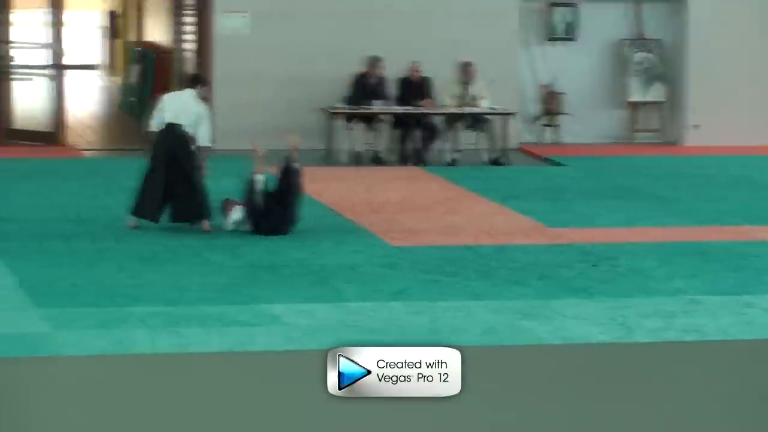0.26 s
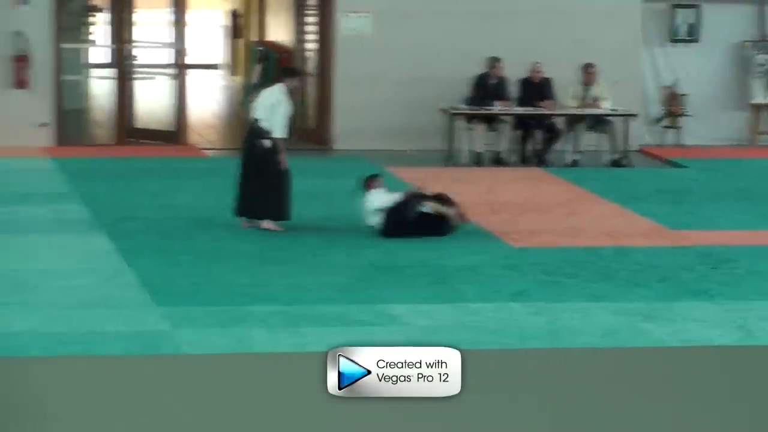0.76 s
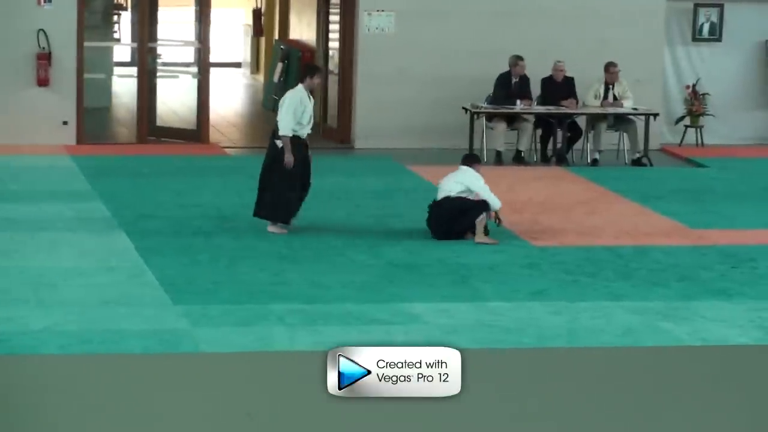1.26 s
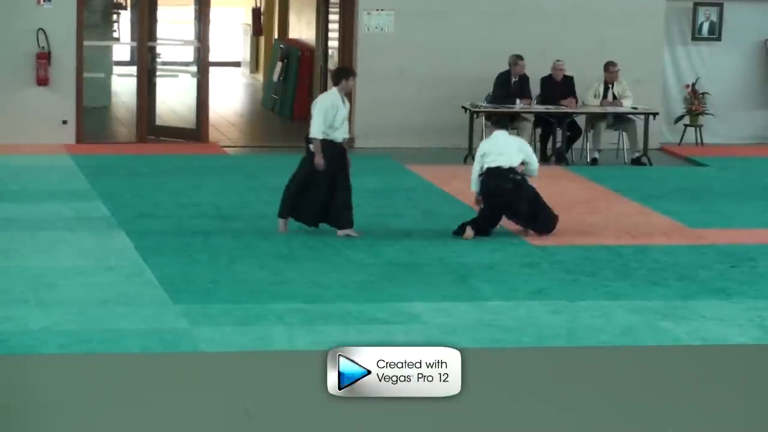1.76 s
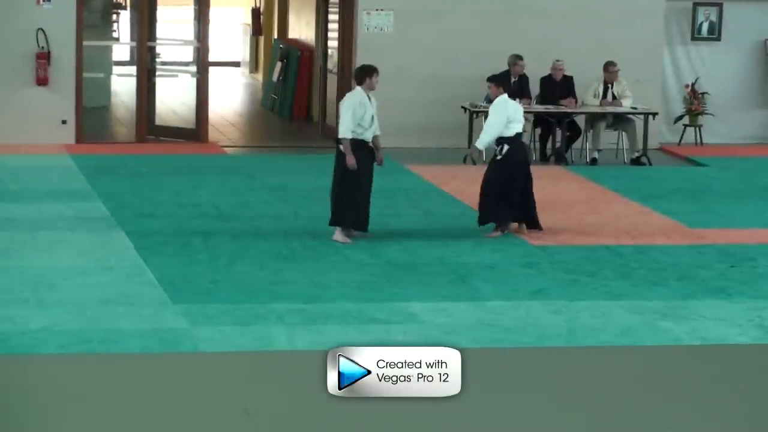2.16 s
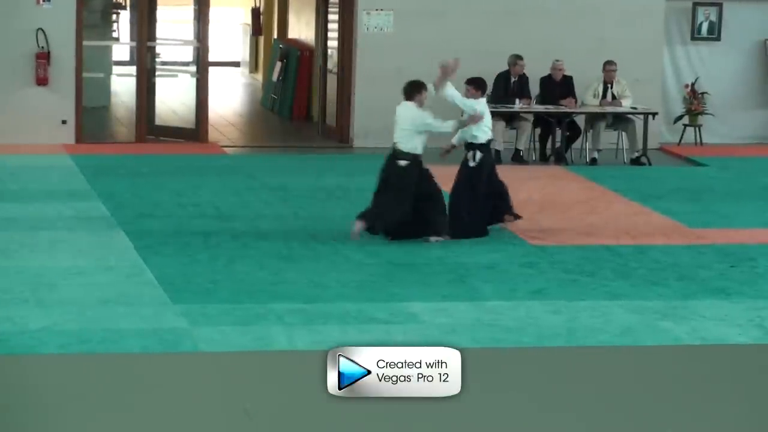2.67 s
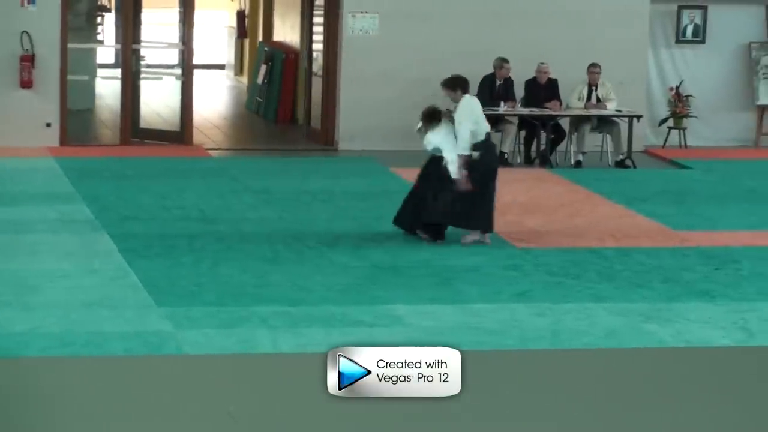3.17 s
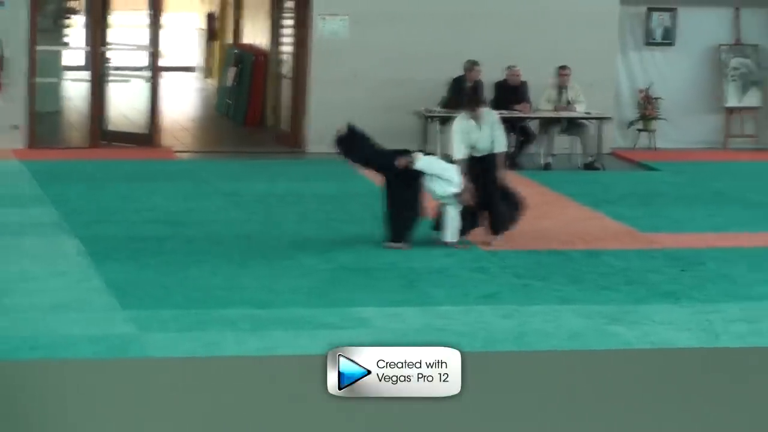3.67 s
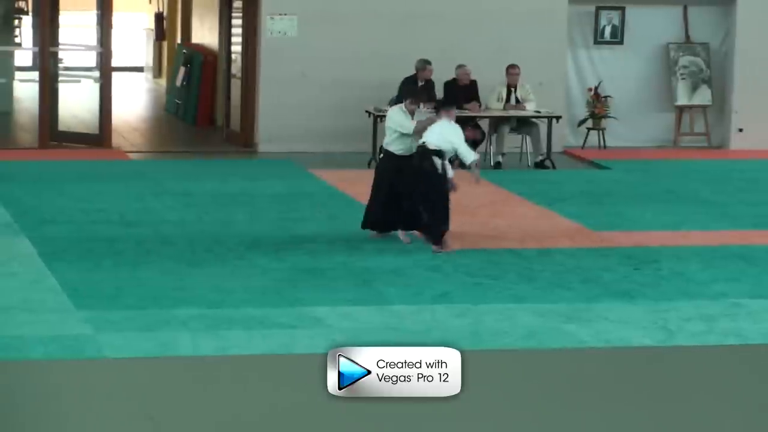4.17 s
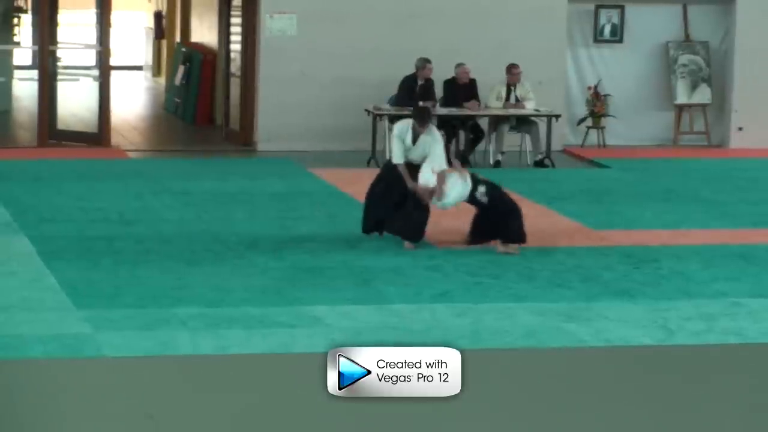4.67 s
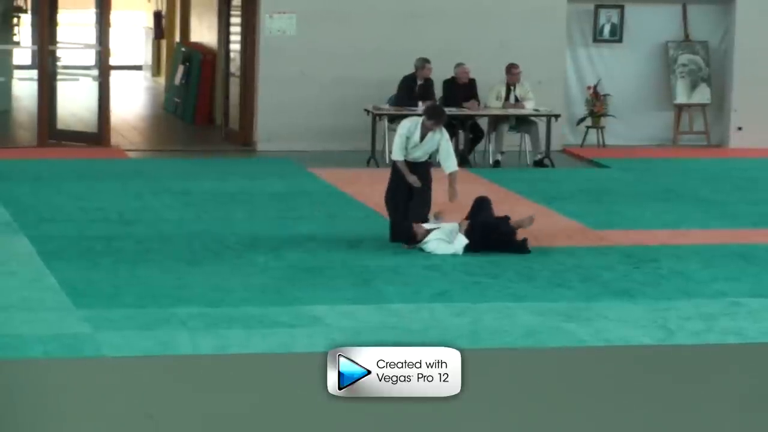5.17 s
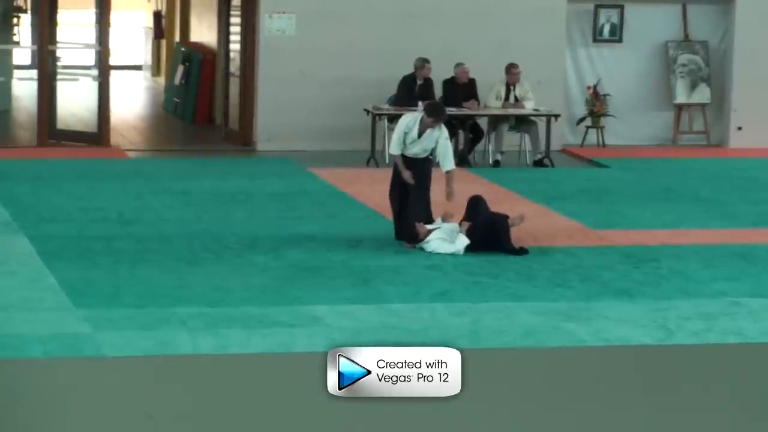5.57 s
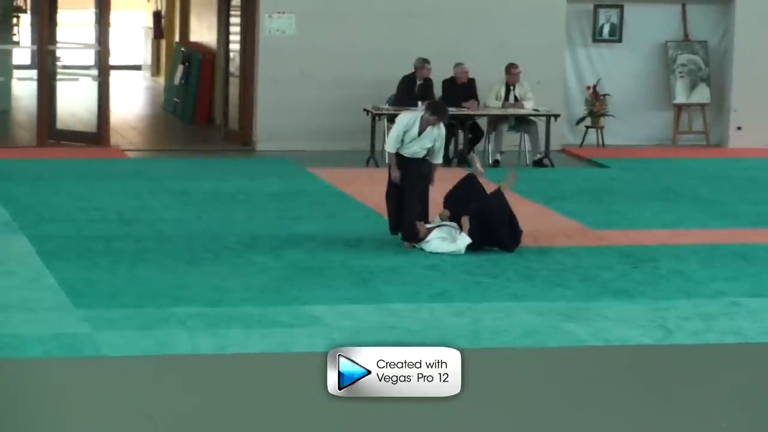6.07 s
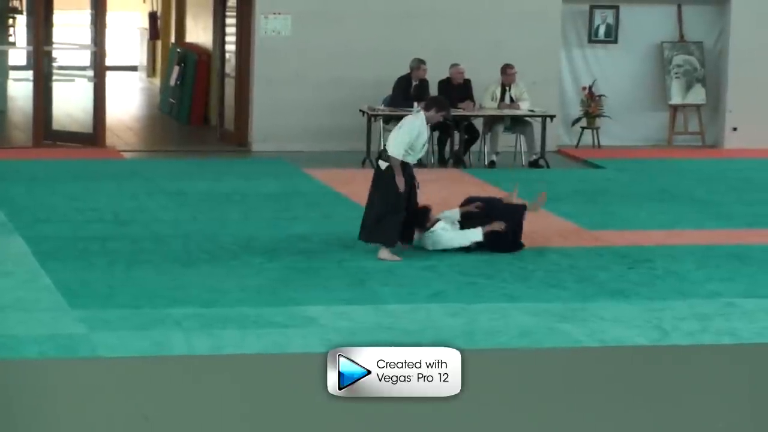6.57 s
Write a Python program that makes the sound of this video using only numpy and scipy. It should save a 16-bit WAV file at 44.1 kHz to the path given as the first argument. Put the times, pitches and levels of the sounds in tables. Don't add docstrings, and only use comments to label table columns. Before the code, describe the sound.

A large, reverberant hall heard from a distant stereo camera, with low ventilation rumble and soft hiss throughout. At the start the low boom and ring of an earlier fall die away, with dull knee bumps at 0.06, 0.3 and 0.6 seconds, a low chirp of skin near 0.65, and faint cloth and foam shuffling until 2. At 2.02 a foot stamps with a short, bright crack, a softer second hit right behind it; the floor booms and walls slap back. A slide and higher squeak come around 2.6, soft shuffling near 3.1, a bright slide with a thin falling squeal at 3.4, and light quick steps from 4.05 to 4.5. At 4.94 a body and palms slam down: the loudest, a broad slap with deep thud, fluttering echoes and a ringing tail of over a second. Foam shifts near 5.65; an airy slide brushes by at 6.5, then hum.

```python
import sys
import numpy as np
from scipy import signal
from scipy.fft import rfft, irfft
from scipy.io import wavfile
from scipy.ndimage import uniform_filter1d, map_coordinates

SR = 44100
rng = np.random.default_rng(int(sys.argv[2]) if len(sys.argv) > 2 else 0)


def output_pcm(signal):
    pcm = np.clip(np.atleast_2d(signal).T, -1, 1) * 32767
    wavfile.write(sys.argv[1], SR, np.round(pcm).astype(np.int16))


def voltage_ratio(level):
    return 10 ** (np.asarray(level, float) / 20)


N = 301203
LEAD = SR // 2

# start in seconds, slap peak in dB, thud peak in dB,
# hall level relative to the slap in dB, hall level relative to the thud in dB.
EARLIER = [
    (-.2, -29.5, -21.5, -10.5, -5),
]
STAMP = [
    (2.0213, -11.5, -15, -20.5, -8),
    (2.0586, -18, -13.5, -21, -7),
]
FALL = [
    (4.9418, -13.5, -7, -14.5, -10.5),
]
# pitch in Hz, level in dB, time to fade 60 dB in seconds.
STAMP_MAT = [(194, -3, 0.058), (347, 5.5, 0.026), (415, 3, 0.036), (515, 2, 0.017)]
FALL_MAT = [(166.6, -7, 0.16), (300.5, -0.5, 0.06), (367.6, -2.5, 0.069), (538, -6, 0.023)]
# frequency in Hz, level in dB per Hz.
SNAP = [(500, -8), (1000, 9.5), (1700, 1), (2100, 6.5), (2700, 1.5), (3700, -0.5), (5000, -3), (6800, -3.5),
        (11000, -19), (15500, -52)]
SLAP = [(500, -16), (1100, 11.5), (1500, -2), (2000, 6), (2600, -1), (3300, 2.5), (5000, -6), (7000, -10),
        (11000, -19.5), (15500, -39)]


def unit(x):
    return x / np.sqrt(np.mean(np.abs(x) ** 2) + 1e-20)


def along(points, hz):
    f, v = np.transpose(points)
    return np.interp(np.log(hz + 1), np.log(f + 1), v)


def wobble(rate):
    return map_coordinates(rng.standard_normal(int(N * rate / SR) + 4), [np.arange(N) * rate / SR])


def patchy(hz, t, across, along_time):
    field = rng.standard_normal((len(hz), len(t)))
    return unit(uniform_filter1d(uniform_filter1d(field, size=across, axis=0), size=along_time, axis=1))


def stereo(length, shape, alike, pan, lead=((100, 0),)):
    hz, t, z = signal.stft(rng.standard_normal((2, length)), SR, nperseg=1024)
    turn = np.arccos(np.clip(along(alike, hz), -1, 1))[:, None] / 2
    mid, side = z[0] * np.cos(turn), z[1] * np.sin(turn)
    lean = (voltage_ratio(along(pan, hz) / 2) * np.exp(.5j * along(lead, hz)))[:, None]
    pair = np.array([(mid + side) * lean, (mid - side) / lean])
    pair = pair / np.hypot(np.abs(lean), 1 / np.abs(lean)) * np.sqrt(2)
    return signal.istft(pair * shape(hz[:, None], t), SR, nperseg=1024)[1][:, :length]


def add(track, s, sound):
    at = LEAD + round(s * SR)
    track[:, at:at + sound.shape[1]] += sound


def strokes(rows):
    s, db, rise, fall = np.transpose(rows)[:4, :, None]
    late = np.arange(0, N + 64, 64) / SR - s
    distance = np.where(late < 0, -late / rise, late / fall)
    return voltage_ratio(db - 10.5 * distance ** 1.38)


def smooth(steps):
    return np.interp(np.arange(N) / 64, np.arange(len(steps)), steps)


def air():
    # frequency in Hz, level in dB per Hz.
    hum = [(15, -4), (26, 0), (36, 6), (65, -6), (125, -5.5), (200, -13), (400, -17), (1000, -18.5),
           (2200, -24), (3200, -28), (6000, -31.5), (9000, -35.5), (12000, -41), (15600, -41)]
    # frequency in Hz, likeness from 0 to 1.
    likeness = [(60, 0.87), (150, 0.33), (380, 0.45), (950, 0.37), (2380, 0.42), (5980, 0.35),
                (15000, 0.14)]
    # frequency in Hz, left over right in dB.
    balance = [(60, -17), (120, -17.5), (240, -7.5), (480, -0.5), (950, 1), (3800, 0), (8000, -3.5),
               (11400, -0.5), (11600, -60), (14700, -60), (14900, -26)]

    def shape(hz, t):
        return voltage_ratio(along(hum, hz) + patchy(hz, t, 14, 8))
    return voltage_ratio(-46 + 0.24 * wobble(2.83)) * unit(stereo(N, shape, likeness, balance))


def shifting_weight():
    # peak time in seconds, level in dB, rise in seconds, fall in seconds.
    shuffle = [(.1, -54, 0.14, 0.09), (.315, -49, 0.013, 0.062), (.6, -51.5, 0.17, .2),
               (.95, -54, 0.073, 0.041), (1.4, -47, 0.046, 0.14), (1.65, -48, 0.077, 0.26),
               (1.93, -52, 0.02, 0.035), (3.11, -45.5, 0.035, 0.046), (3.19, -52, 0.024, 0.043),
               (3.6, -52.5, 0.19, 0.27), (4.02, -55, 0.024, 0.096), (4.14, -42, 0.053, 0.37),
               (4.5, -62, 0.21, 0.22), (4.83, -52, 0.041, 0.029), (5.65, -43, 0.19, 0.062)]
    # frequency in Hz, level in dB per Hz.
    foam_colour = [(60, -120), (120, -20), (170, 6.5), (300, 3.5), (600, -1), (1200, -9.5), (1800, -16),
                   (2500, -39), (5000, -120)]
    noise = unit(stereo(N, lambda hz, t: voltage_ratio(along(foam_colour, hz)), [(500, 0.75)], [(500, -9.0)]))
    lumps = voltage_ratio(1.5 * wobble(60))
    return voltage_ratio(-4.5) * smooth(strokes(shuffle).sum(axis=0)) * lumps * noise


def sliding():
    # peak time in seconds, level in dB, rise in seconds, fall in seconds, brightness from 0 to 1.
    slides = [(.22, -62, 0.1, 0.59, 0.5), (.64, -60, 0.064, .1, 0.4), (.73, -57, .04, 0.084, 0.5),
              (.95, -60.5, 0.24, 0.16, 0.1), (1.39, -57, 0.034, 0.21, 0.5), (1.59, -58, .05, .11, 0.25),
              (1.76, -61.5, .05, .13, 0.3), (2.63, -51.5, 0.13, 0.1, 0.38), (2.9, -61, 0.26, 0.14, .2),
              (3.05, -58.5, .04, 0.065, .45), (3.39, -54.5, 0.061, 0.18, .99), (3.5, -51, 0.1, 0.3, 0.24),
              (4.107, -53, 0.012, 0.081, .98), (4.37, -55, 0.17, 0.29, 0.4), (4.84, -61.5, .06, 0.16, 0.2),
              (6.49, -51.5, 0.17, 0.12, 0.8), (6.65, -57.5, .06, 0.1, 0.1)]
    # frequency in Hz, level in dB per Hz.
    dull_colour = [(1200, -120), (2500, -8.5), (3900, -3.5), (4600, -1.5), (5500, -1), (8000, -4.5),
                   (12000, -44), (15500, -25)]
    bright_colour = [(1500, -120), (3000, -13.5), (6000, -1), (8500, 0.5), (11500, -6), (15500, -24)]
    balance = [(5000, -7.5), (11300, -2.5), (13300, -14), (13800, -50)]  # Hz, left over right in dB
    dull = unit(stereo(N, lambda hz, t: voltage_ratio(along(dull_colour, hz)), [(5000, 0.56)], balance))
    sharp = unit(stereo(N, lambda hz, t: voltage_ratio(along(bright_colour, hz)), [(5000, 0.56)], balance))
    power = strokes(slides) ** 2
    bright = np.clip(np.transpose(slides)[4], 0, 1)
    dull_gain = smooth(np.sqrt((1 - bright) @ power))
    sharp_gain = smooth(np.sqrt(bright @ power))
    return voltage_ratio(0.64 * wobble(35)) * (dull_gain * dull + sharp_gain * sharp)


def squeaks():
    # peak time in seconds, level in dB, rise in seconds, fall in seconds, pitch in Hz.
    catches = [
        (.645, -52, 0.049, 0.036, 1270),
        (2.575, -48.5, 0.075, 0.067, 3340),
        (3.415, -48.5, 0.036, 0.044, 5120),
    ]
    glides = [.3, -.1, -1.05]
    catch = voltage_ratio(2.5 * wobble(90) + 1.5 * wobble(30) - 3)
    shake = 1.5 * wobble(330) + 2.5 * wobble(60)
    squeak = 0
    for level, (s, *_, hz), glide in zip(strokes(catches), catches, glides):
        late = np.arange(N) / SR - s
        turn = 2 * np.pi * hz * (late + glide * late ** 2 / 2)
        squeak = squeak + smooth(level) * catch * np.cos(turn + (hz / 3200) ** 1.5 * shake)
    return squeak * voltage_ratio([[-2.5], [2.5]])


def sprung_floor():
    # peak time in seconds, level in dB, rise in seconds, fall in seconds.
    booms = [(.005, -32.5, 0.023, 0.039), (.1, -34, 0.047, 0.049), (.17, -33, 0.056, 0.12),
             (.32, -36, 0.026, 0.018), (.4, -35, 0.033, 0.0087), (.47, -46, 0.027, 0.069),
             (.575, -44, 0.036, 0.021), (2.032, -17, 0.014, 0.058), (2.11, -18, 0.041, 0.089),
             (2.29, -31, 0.027, .04), (2.41, -26.5, 0.18, 0.11), (2.65, -35, .07, 0.031),
             (2.8, -46.5, .1, 0.2), (4.135, -41, .015, .08), (4.525, -40.5, 0.065, 0.071),
             (4.72, -44.5, 0.062, 0.056), (4.954, -11.5, 0.0098, 0.042), (5.01, -19, .03, 0.056),
             (5.14, -18, 0.035, 0.044), (5.24, -28, 0.034, 0.03), (5.32, -23, 0.063, 0.053),
             (5.42, -31, .04, .05), (5.52, -30, 0.044, 0.043), (5.635, -29.5, 0.044, 0.026),
             (5.74, -35, 0.041, .03), (5.81, -39, 0.033, 0.031), (5.95, -41, .04, 0.04)]
    t = np.arange(N) / SR
    blows = np.array([EARLIER[0][0], STAMP[0][0], FALL[0][0]])
    cause = blows[np.searchsorted(blows, np.transpose(booms)[0]) - 1, None]
    begun = np.arange(0, N + 64, 64) / SR > cause
    gain = smooth(np.sqrt(((strokes(booms) * begun) ** 2).sum(axis=0)))
    age = np.minimum(t - blows[np.searchsorted(blows, t) - 1], 1)
    hz = 94 - 9 * age
    ring = 0
    for ratio, db in ((1.0, -0.77), (.8, -1.2)):
        turn = 2 * np.pi * np.cumsum(ratio * hz + 8 * wobble(25)) / SR
        apart = 0.43 + 0.11 * wobble(10)
        ring = ring + voltage_ratio(db + 2.5 * wobble(25)) * np.exp(1j * (turn + np.array([apart, -apart])))
    ring = ring / np.sqrt(uniform_filter1d(np.abs(ring) ** 2, size=1200).mean(axis=0))
    balance = voltage_ratio(np.array([[.5], [-.5]]) * -3.5)
    high_pass = signal.butter(N=2, Wn=57, btype='high', fs=SR, output='sos')
    return signal.sosfilt(high_pass, np.sqrt(2) * gain * balance * ring.real)


def reverberation(slap_db, thud_db, high, low, dwell):
    # frequency in Hz, time to fade 60 dB in seconds.
    fade = [(150, 1.59), (350, 1.28), (800, 1.64), (1500, 1.8), (1950, 1.84), (2600, 1.79), (5000, 1.51),
            (11000, 0.68)]
    # frequency in Hz, likeness from 0 to 1.
    likeness = [(60, 1), (180, 0.82), (550, 0.74), (1650, 0.69), (4970, 0.57), (15000, .6)]
    # frequency in Hz, left over right in dB.
    balance = [(100, 1.5), (200, -3), (550, -3), (1650, -5.5), (4970, -8.5), (9000, -8), (11300, 6),
               (11900, -45)]
    # frequency in Hz, lead in radians.
    left_lead = [(60, 0.63), (260, 0.62), (2000, 0.52), (4000, 0.51)]

    def shape(hz, t):
        colour = voltage_ratio(slap_db) * unit(voltage_ratio(along(high, hz))) + voltage_ratio(thud_db) * unit(voltage_ratio(along(low, hz)))
        uneven_db = 2.04 * patchy(hz, t, 5, 3) + 1.05 * patchy(hz, t, 30, 7)
        return colour * voltage_ratio(uneven_db - 60 * t / (dwell * along(fade, hz)))
    length = SR + SR // 4 if thud_db > -36 else SR // 2
    tail = stereo(length, shape, likeness, balance, left_lead)
    build_up = (1 - np.exp(-np.arange(length) / SR / .008)) ** 2
    return tail * build_up * np.linspace(1, 0, length) ** 0.029


def blow(slap_db, thud_db, pan_db, ms, slap, mat, spread):
    t = np.arange(SR // 5) / SR
    noise = rng.standard_normal((2, len(t)))
    noise = noise[0] + spread * noise * [[0], [1]]
    hz = np.fft.rfftfreq(len(t), 1 / SR)
    colour = voltage_ratio(along(slap, hz) + 12 / ms * np.log2(hz / 2500 + 0.22))
    fade = voltage_ratio(-60 * t / ms * 1000)
    burst = rfft(noise * fade)
    even = burst / np.sqrt(np.abs(uniform_filter1d(np.abs(burst) ** 2, size=200, axis=1)) + 1e-9)
    crack = irfft(even * colour, len(t)) * fade * (1 - np.exp(-t / 0.00013))
    crack = crack / np.abs(crack).max(axis=1, keepdims=True)
    thud = 0
    for (pitch, db, t60), scatter_db in zip(mat, rng.standard_normal(len(mat))):
        thud = thud + voltage_ratio(db + scatter_db - 60 * t / t60) * np.sin(2 * np.pi * pitch * t)
    thud = -thud * (1 - np.exp(-t / 0.0013)) ** 2
    crack_gain = voltage_ratio(slap_db + 1.5 + np.array([[.5], [-.5]]) * pan_db)
    return crack_gain * crack + voltage_ratio(thud_db + 4 + np.array([[-1.2], [1.2]])) * thud


def contacts_and_echoes(track):
    # start in seconds, slap peak in dB, thud peak in dB, left over right in dB,
    # time for the slap to fade 60 dB in milliseconds.
    following = [(2.0252, -23, -37, -7, 13), (2.032, -25.5, -38, -15, 21), (2.096, -26, -26, -12, 16),
                 (2.069, -21, -21, -4, 14), (2.0908, -21.5, -19, -13, 18), (2.1167, -28, -48, -14, 20),
                 (2.2735, -34, -25, -10, 25), (4.9438, -10.5, -41, -1, 15), (4.945, -40, -15, -2, 10),
                 (4.964, -21, -36, -9, 32), (5.012, -22, -16, -4, 55), (4.9595, -17, -12, 1, 24),
                 (4.971, -19, -40, -8, 22), (4.9914, -18, -15.5, -3, 28), (5.001, -19, -14, -3, 61),
                 (5.073, -22, -16, -18, 32), (5.0944, -25.5, -20.5, -19, 9), (5.121, -36, -30, -9, 24),
                 (5.15, -39, -31, -6, 21), (5.176, -32, -27, -6, 26), (5.19, -47, -46, -6, 17),
                 (5.319, -52, -30.5, -4, 28), (5.412, -46, -37, -9, 25)]
    for s, slap_db, thud_db, pan_db, ms in following:
        slap, mat = (SLAP, FALL_MAT) if s > FALL[0][0] else (SNAP, STAMP_MAT)
        add(track, s, blow(slap_db, thud_db, pan_db, ms, slap, mat, spread=0.78))


def air_pockets(track):
    # start in seconds, peak in dB, pitch in Hz, time to fade 60 dB in milliseconds.
    pocket_rows = [(2.0216, -22, 6800, 11), (2.0216, -22, 1850, 9), (2.0214, -14, 2750, 7.6),
                   (2.0212, -28, 9350, 4), (2.0612, -36, 8900, 8), (2.0615, -33, 6300, 8),
                   (2.06, -21, 4150, 6.8), (2.0692, -31, 5500, 12), (2.0712, -32, 4700, 14),
                   (2.0910, -25, 4700, 8), (2.0955, -28, 4840, 14), (2.1160, -26.5, 3920, 16),
                   (2.155, -40, 2370, 40), (2.187, -36, 1720, 36), (2.2715, -34.5, 3700, 22),
                   (2.274, -36, 1960, 50), (4.943, -12.5, 2060, 11), (4.9426, -29, 1140, 20),
                   (4.9430, -22, 4660, 9), (4.944, -22, 3800, 7), (4.9585, -29, 7500, 14),
                   (4.9593, -25, 3260, 18), (4.97, -23, 3080, 12), (4.9715, -28, 6500, 12),
                   (4.9910, -21.5, 3400, 15), (4.9922, -26, 4770, 12), (4.9990, -23, 3400, 14),
                   (5.0720, -31, 7100, 16), (5.072, -27, 3230, 10), (5.095, -33, 5400, 9.9),
                   (5.1170, -33.5, 3220, 50), (5.1270, -39, 4800, 40), (5.1860, -36, 3020, 35),
                   (5.2090, -37, 3200, 20)]
    t = np.arange(SR // 10) / SR
    balance_db = np.array([[.5], [-.5]]) * -4
    for s, db, hz, ms in pocket_rows:
        shake = np.cumsum(rng.standard_normal((2, len(t))), axis=1) * 0.081 + rng.uniform(0, 2 * np.pi)
        shape = voltage_ratio(-60 * t / ms * 1000) * (1 - np.exp(-t / (0.02 * ms / 1000))) ** 2
        add(track, s, voltage_ratio(db + balance_db) * shape / shape.max() * np.sin(2 * np.pi * hz * t + shake))


def contacts():
    steps = [(3.106, -63, -48.5, -20, -6), (4.052, -40, -62, -22, -11), (4.121, -38.5, -32.5, -17, -8),
             (4.145, -44, -33.5, -19, -21), (4.172, -52, -32, -16, -23), (4.285, -49, -42, -12, -9),
             (4.299, -49, -53, -7, -15), (4.465, -43.5, -42, -13, -28), (4.503, -46, -39.5, -23, -12)]
    knees = [(.058, -38, -33, -18, -24), (.308, -40.5, -32, -13.5, -21), (.322, -60, -41, -21, -26),
             (.601, -32, -61, -17.5, -14), (.645, -50, -44.5, -18, -19)]
    # pitch in Hz, level in dB, time to fade 60 dB in seconds.
    step_mat = [(144, -1, 0.117), (271.6, -5, 0.046), (383, -14.5, 0.054), (685, -8, 0.022)]
    knee_mat = [(257, -4.5, 0.086), (330, -6, 0.065), (470, 0, 0.025), (800, -11, 0.023)]
    # frequency in Hz, level in dB per Hz.
    tap = [(400, -28), (850, 6), (1300, 2), (2200, -2.5), (3800, -11), (5000, -20), (9000, -35),
           (15500, -60)]
    stamp_high = [(410, -13), (700, -5.5), (850, -2), (1100, -2), (1500, -4.5), (1950, -0.5), (2350, -8),
                  (2800, -8.5), (3920, -4), (5860, -9.5), (7400, -8.5), (11800, -21), (13400, -26),
                  (15500, -52)]
    fall_high = [(410, -43), (700, -1.5), (907, -4.5), (1100, -1), (1390, -5), (1780, -6.5), (2030, -3),
                 (2590, -7), (3320, -5.5), (3920, -7.5), (5360, -9), (10500, -15), (14300, -33),
                 (15500, -48)]
    stamp_low = [(74, -24), (118, 4), (150, -6), (199, -3.5), (242, -23.5), (280, 3.5), (348, -9),
                 (385, -5.5), (464, -7.5), (659, -22.5), (800, -27), (1040, -40), (1760, -120)]
    fall_low = [(74, -22), (115, 5), (150, -5), (236, -12.5), (274, -3.5), (377, 1.5), (420, -11),
                (457, -10.5), (551, -11.5), (701, -27), (800, -35), (1040, -52), (1760, -120)]
    earlier_low = [(74, -20), (125, 4.5), (200, -0.5), (260, -9), (400, -8), (600, -18.5), (1040, -36),
                   (1760, -120)]
    step_low = [(70, -40), (110, 27), (155, -1), (220, -13), (330, -2), (550, -40), (900, -19), (1500, -60),
                (2500, -120)]
    # blows, slap fade in ms, slap colour, mat, hall high, hall low, how long the hall dwells.
    kinds = [(STAMP, 6.5, SNAP, STAMP_MAT, stamp_high, stamp_low, 1.03),
             (FALL, 53, SLAP, FALL_MAT, fall_high, fall_low, .97),
             (EARLIER, 53, SLAP, FALL_MAT, fall_high, earlier_low, .9),
             (steps, 23, tap, step_mat, fall_high, step_low, .8),
             (knees, 24, tap, knee_mat, tap, stamp_low, .8)]
    track = np.zeros((2, N + 3 * SR))
    for rows, ms, slap, mat, high, low, dwell in kinds:
        for s, slap_db, thud_db, slap_share, thud_share in rows:
            add(track, s, blow(slap_db, thud_db, -5.0, ms, slap, mat, spread=0.82))
            add(track, s, reverberation(slap_db + slap_share, thud_db + thud_share, high, low, dwell))
    contacts_and_echoes(track)
    air_pockets(track)
    return track[:, LEAD:LEAD + N]


def thin_left_bass(x):
    low = signal.sosfiltfilt(signal.butter(N=2, Wn=195, fs=SR, output='sos'), x)
    level_db = 10 * np.log10(np.abs(uniform_filter1d(low[1] ** 2, size=3000)) + 1e-12)
    kept = voltage_ratio(np.clip(0.89 * (level_db + 24.5), -28, 0))
    return np.array([x[0] - (1 - kept) * low[0], x[1]])


def scene():
    feet = sliding() + shifting_weight() + squeaks()
    return air() + feet + thin_left_bass(sprung_floor() + contacts())


def roll_off(x):
    return signal.sosfilt(signal.butter(12, 15740, fs=SR, output="sos"), x)


def record(dry):
    top, knee = .92, 6
    rounded = dry / (1 + np.abs(dry / top) ** knee) ** (1 / knee)
    low_pass = signal.butter(N=10, Wn=15200, fs=SR, output='sos')
    return roll_off(signal.sosfiltfilt(low_pass, rounded))


dry = scene()
out = record(dry)
output_pcm(out)
```